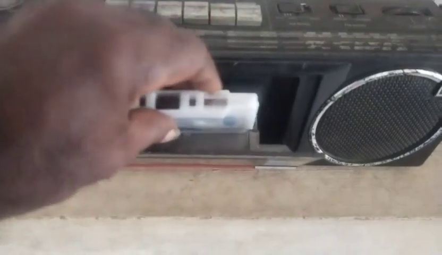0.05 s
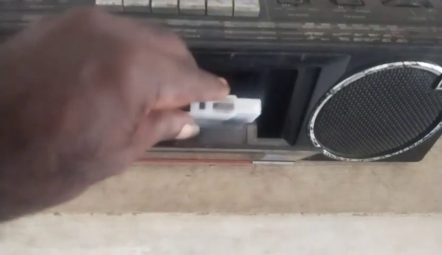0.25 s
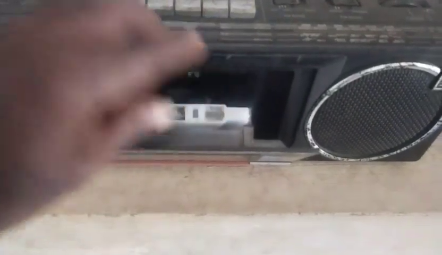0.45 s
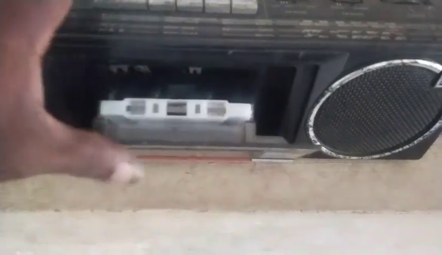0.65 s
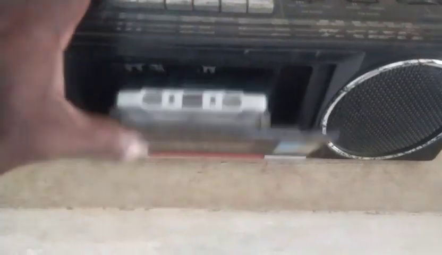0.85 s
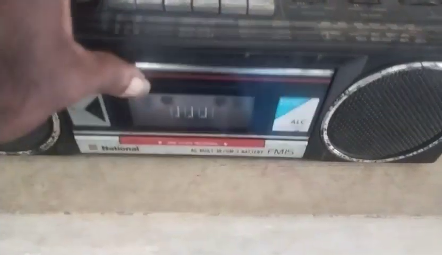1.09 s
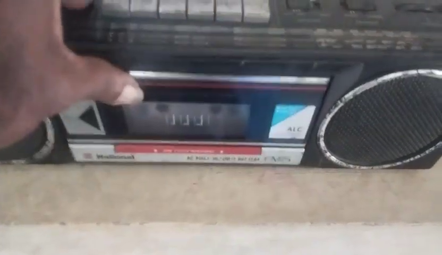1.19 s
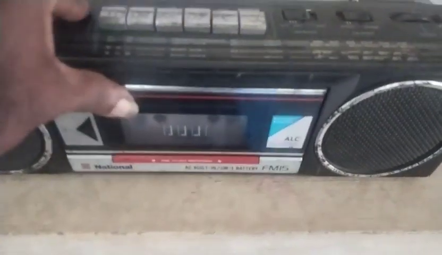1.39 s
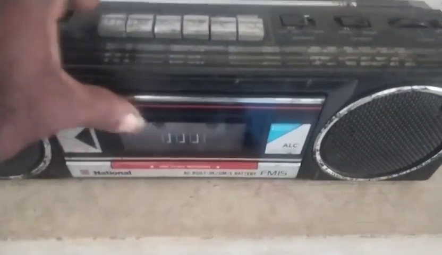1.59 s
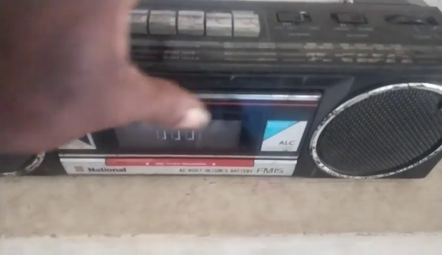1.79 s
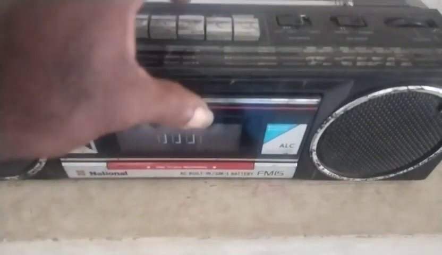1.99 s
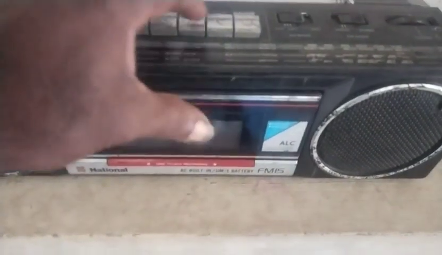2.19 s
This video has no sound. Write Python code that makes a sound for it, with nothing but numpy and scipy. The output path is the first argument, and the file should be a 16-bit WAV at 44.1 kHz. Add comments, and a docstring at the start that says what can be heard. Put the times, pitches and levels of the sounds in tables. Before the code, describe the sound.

Plastic clacks as a cassette slides into a player and its door snaps shut.

```python
"""A cassette slides into the open door of a portable player and clacks onto its seat; the door is pushed
shut and latches. The shell rubs and squeaks, each contact rattles the plastic, weighty blows ring the
hollow case, and the metal tape mechanism rings on after the cassette's knocks. The player sits to the
left in a bare, echoing room. Birds call faintly from outside over a low rumble."""
import sys
import numpy as np
from scipy import signal
from scipy.fft import rfft, irfft
from scipy.io import wavfile
from scipy.ndimage import uniform_filter1d

SR = 44100
rng = np.random.default_rng(int(sys.argv[2]) if len(sys.argv) > 2 else 0)


def generate_wav(sig):
    """Save sig (samples, or channels by samples) to the path in sys.argv[1] as 16-bit PCM at SR."""
    pcm = np.round(np.clip(np.atleast_2d(sig).T, -1, 1) * 32767).astype(np.int16)
    wavfile.write(sys.argv[1], SR, pcm)


N = 99225
T = np.arange(N) / SR
FFT_SIZE = 2 ** 17
HZ = np.maximum(np.arange(FFT_SIZE // 2 + 1) * SR / FFT_SIZE, 1)


def from_db(db):
    """Decibels to gain."""
    return 10 ** (np.asarray(db) / 20)


def unit_rms(x):
    """Scale to unit power."""
    return x / np.sqrt(np.mean(np.abs(x) ** 2) + 1e-20)


def at_hz(points, hz=HZ):
    """Read a table on a log-frequency axis."""
    freqs, values = np.transpose(points)
    return np.interp(np.log(hz), np.log(freqs), values)


def boosts(modes):
    """Gain curve of a set of resonances."""
    return 1 + sum((from_db(db) - 1) / (1 + (2 * (HZ - hz) / width) ** 2) for hz, width, db in modes)


def panned(points):
    """Left and right gain curves."""
    return from_db(at_hz(points) * np.array([[.5], [-.5]]))


def eq(x, gain):
    """Minimum-phase EQ with the given gain curve: no pre-ringing."""
    cepstrum = irfft(np.log(gain + 1e-9))
    size = cepstrum.shape[-1]
    cepstrum[..., 1:size // 2] *= 2
    cepstrum[..., size // 2 + 1:] = 0
    return irfft(rfft(x, size) * np.exp(rfft(cepstrum)), size)[..., :N]


def whiten(burst):
    """Flatten a burst's spectrum, so that only the plastic colours it."""
    power = uniform_filter1d(np.abs(rfft(burst)) ** 2, size=7)
    return eq(burst, np.sqrt(power.mean() / power))


def add(out, s, sound):
    """Mix a sound in at s seconds."""
    start = int(s * SR)
    part = sound[..., :max(N - start, 0)]
    out[..., start:start + part.shape[-1]] += part


def note(length, start_hz, end_hz, db, rough):
    """A gliding tone that swells and fades; rough is its jitter as a share of the pitch."""
    progress = np.linspace(0, 1, int(length * SR))
    jitter = unit_rms(uniform_filter1d(rng.standard_normal(N), size=60))[:len(progress)]
    hz = (start_hz + (end_hz - start_hz) * progress) * (1 + rough * jitter)
    return from_db(db) * np.sin(np.pi * progress) * np.sin(2 * np.pi * np.cumsum(hz) / SR)


# stereo image of the room: f/Hz, left-right correlation
ROOM_CORRELATION = [(300, 0.83), (600, 0.68), (1200, 0), (12000, 0.077)]


def diffuse_noise():
    """White stereo noise, narrow in the bass and wide in the treble."""
    mid, side = rfft(rng.standard_normal((2, FFT_SIZE)))
    alike = at_hz(ROOM_CORRELATION)
    return irfft(np.sqrt((1 + alike) / 2) * mid + np.sqrt((1 - alike) / 2) * side * [[1], [-1]])[:, :N]


# tone of the air and of the rumble: f/Hz, gain/dB
AIR_EQ = [(25, -27), (97, -6), (200, -20.5), (420, -15.5), (520, -7.5), (680, -19.5), (1400, -15.5),
          (3000, -21), (5500, -31), (10000, -31), (15000, -40)]
RUMBLE_EQ = [(30, -41.5), (70, -22.5), (97, 2.5), (125, -6), (152, -2.5), (230, -17), (3000, -91.5)]
# fader ride on the rumble: t/s, level/dB
RUMBLE_RIDE = [(0, -56.5), (.8, -68.5), (1.05, -52), (1.3, -51.5), (1.55, -56), (1.8, -70.5), (2.0, -67.5),
               (2.13, -63), (2.25, -78.5)]


def background(air_db=-61):
    """A bed of faint steady air and a low rumble that swells and sinks."""
    air = unit_rms(eq(diffuse_noise(), from_db(at_hz(AIR_EQ))))
    rumble = unit_rms(eq(diffuse_noise(), from_db(at_hz(RUMBLE_EQ))))
    return from_db(air_db) * air + rumble * from_db(np.interp(T, *np.transpose(RUMBLE_RIDE)))


# falling bird whistles: t/s, length/s, start f/Hz, end f/Hz, level/dB
BIRD_WHISTLES = [(1.40, .27, 4280, 3750, -52), (1.53, .19, 3200, 3000, -56), (1.57, .18, 3700, 3300, -59),
                 (1.70, .12, 2750, 2420, -62), (1.45, .22, 5600, 5000, -67), (2.19, .12, 5000, 4100, -65)]
# soft piping of a farther bird: t/s, length/s, f/Hz, level/dB
BIRD_PIPES = [(1.474, .08, 1515, -55), (1.592, 0.068, 1211, -51.5), (1.78, 0.049, 1162, -54),
              (1.905, 0.095, 1224, -53.5), (2.065, 0.028, 1274, -52.5), (2.092, 0.13, 1230, -55)]


def birds():
    """Raspy whistles and a row of piping notes, scattered differently on the way to each side."""
    out = np.zeros((2, N))
    for side in out:
        for s, length, start_hz, end_hz, db in BIRD_WHISTLES:
            add(side, s, note(length, start_hz, end_hz, db, rough=.045))
        for s, length, hz, db in BIRD_PIPES:
            add(side, s, note(length, hz, hz, db, rough=.02))
    return out


# reverb decay: f/Hz, T60/s
ROOM_DECAY = [(100, 3.9), (260, 1.06), (700, 1.29), (1900, 0.99), (4800, 1.31), (8000, 0.89), (13000, 0.8)]
# tone of the reverb return: f/Hz, gain/dB
ROOM_EQ = [(110, -6), (250, -1.5), (550, -2.5), (1100, -0.5), (2200, -4), (4200, -9.5), (8000, -2.5),
           (14000, -9)]
# room resonances: f/Hz, width/Hz, boost/dB
ROOM_RESONANCES = [(200, 27, 10.5), (531, 14, 4), (696, 20, 4.5)]
# balance of the reverb: f/Hz, left over right/dB
ROOM_BALANCE = [(250, -0.5), (1100, 1.5), (2200, 7), (4500, 4), (8500, -4.5), (13000, -1)]


def room(x, build_s=0.013):
    """Bare walls return a diffuse tail that builds quickly and hangs longest in the bass."""
    noise, tail = rfft(diffuse_noise(), FFT_SIZE), 0
    centres = np.geomspace(60, 15000, num=14)
    for hz, pick in zip(centres, np.eye(len(centres))):
        band = irfft(noise * np.interp(np.log(HZ), np.log(centres), pick))[:, :N]
        tail = tail + band * from_db(-60 * T / at_hz(ROOM_DECAY, hz))
    tail = tail * (1 - np.exp(-T / build_s))
    wet = signal.fftconvolve(x[None], unit_rms(tail) / np.sqrt(N), axes=1)[:, :N]
    return eq(wet, from_db(at_hz(ROOM_EQ)) * boosts(ROOM_RESONANCES) * panned(ROOM_BALANCE))


# ring of the metal tape mechanism: f/Hz, gain/dB
METAL_MODES = [(1625, -23), (2000, -21.5), (2630, -21), (3950, -30)]


def mechanism(knocks, t60_s=1.25, detune=.009, partials=4):
    """With the door open, each knock leaves the metal ringing in clusters of close, beating partials."""
    ring = 0
    for hz, db in METAL_MODES:
        pitches = hz * (1 + detune * rng.standard_normal(partials))
        cluster = np.sin(2 * np.pi * np.outer(pitches, T)).sum(axis=0)
        ring = ring + from_db(db) * unit_rms(cluster * from_db(-60 * T / t60_s)) / np.sqrt(N)
    return signal.fftconvolve(knocks, ring)[:N]


# weighty blows on the case: t/s, level/dB
CASE_BLOWS = [(.083, -27.5), (0.168, -32), (.2660, -11.5), (.3160, -23), (.9255, -30), (1.407, -40.5)]
# body of the case: f/Hz, gain/dB, T60/s
CASE_RING = [(379, -18.5, 0.062), (507, -4, 0.07), (550.6, -13.5, 0.15), (645, -9, 0.058), (738, -9, 0.08),
             (1009, -12.5, 0.07), (1142, -16.5, 0.021)]


def case(band_hz=(270, 1445)):
    """The hollow case rings after each blow: too small for deep bass, struck too softly for treble."""
    out, t = np.zeros(N), T[:SR // 2]
    ring = sum(from_db(db - 60 * t / t60) * np.cos(2 * np.pi * hz * t) for hz, db, t60 in CASE_RING)
    for s, db in CASE_BLOWS:
        add(out, s, from_db(db) * ring)
    return signal.sosfilt(signal.butter(2, band_hz, "band", fs=SR, output="sos"), out)


# the shell rubs along the holder: t/s, level/dB
SLIDE_RIDE = [(0, -41.5), (.048, -37.5), (.085, -36.5), (.095, -54), (.145, -49.5), (.158, -36.5),
              (.18, -36), (.2, -51.5), (.23, -43.5), (.26, -60.5)]
# tone of the rubbing: f/Hz, gain/dB
SLIDE_EQ = [(60, -37), (250, -9.5), (400, -6.5), (620, 4.5), (900, -5.5), (1250, 3.5), (1570, -18),
            (1850, 5.5), (2300, 0), (4000, 0.5), (5500, -9.5), (14000, -34)]
# the shell sticks and squeaks: t/s, length/s, f/Hz, level/dB
SHELL_SQUEAKS = [(.036, .028, 1850, -32), (.062, 0.028, 1840, -33), (0.105, 0.022, 1900, -44),
                 (.148, .03, 1950, -44.5)]


def slide(slips_per_s=2500, spread_db=1):
    """Tiny uneven slips of the shell excite the holder and now and then lock into a short squeak."""
    slipping = rng.random(N) < slips_per_s / SR
    strength = from_db(spread_db * np.minimum(rng.exponential(1, N), 4))
    slips = slipping * strength * rng.choice([-1, 1], N)
    pressure = from_db(np.interp(T, *np.transpose(SLIDE_RIDE), right=-np.inf))
    out = eq(unit_rms(slips) * pressure, unit_rms(from_db(at_hz(SLIDE_EQ))))
    for s, length, hz, db in SHELL_SQUEAKS:
        add(out, s, note(length, hz, hz, db, rough=.035))
    return out


RATTLE_T60_S = 0.036
# small parts of the holder and door snap or knock: t/s, f/Hz, width/Hz, peak level/dB
PART_SNAPS = [(.158, 573, 246, -28), (0.2343, 3200, 1510, -15.5), (.8872, 4900, 2870, -16.5),
              (.9265, 2005, 1000, -11.5), (0.9306, 3440, 1500, -16), (1.411, 2730, 700, -40),
              (1.469, 2250, 340, -62), (1.471, 384, 143, -43.5), (1.483, 2300, 303, -47),
              (1.488, 517, 157, -39.5)]


def small_parts(size=2048):
    """Small stiff parts snap, each with a short rattle around its own pitch."""
    out = np.zeros(N)
    for s, hz, width, db in PART_SNAPS:
        resonance = signal.iirpeak(hz, hz / width, fs=SR)
        burst = whiten(rng.standard_normal(size) * from_db(-60 * T[:size] / RATTLE_T60_S))
        click = signal.lfilter(*resonance, signal.lfilter(*resonance, burst))
        add(out, s, from_db(db) * click / np.abs(click).max())
    return out


def contacts(hits, colour, modes, attack=1.3, correlation=0.73, bass_hz=1000, treble_hz=5500, size=4096):
    """Each contact is a sharp transient and a brief dense rattle that sets the plastic part ringing."""
    out = np.zeros((2, N))
    lowpass = signal.butter(2, bass_hz, fs=SR)
    bandpass = signal.butter(2, [bass_hz, treble_hz], "band", fs=SR)
    highpass = signal.butter(2, treble_hz, "high", fs=SR)
    for s, db, bass_db, treble_db in hits:
        noise = rng.standard_normal((3, size))
        rattle = np.sqrt(correlation) * noise[0] + np.sqrt(1 - correlation) * noise[1:]
        burst = rattle * from_db(-60 * T[:size] / RATTLE_T60_S)
        burst[:, 0] = attack
        burst = whiten(burst)
        bass = from_db(bass_db) * signal.lfilter(*lowpass, burst.mean(axis=0))
        mids = signal.lfilter(*bandpass, burst)
        treble = from_db(treble_db) * signal.lfilter(*highpass, burst)
        add(out, s, from_db(db) * (bass - mids + treble))   # mids flipped to avoid crossover notches
    return eq(out, unit_rms(from_db(at_hz(colour)) * boosts(modes)))


# clicks of the door: t/s, level/dB, bass/dB, treble/dB
DOOR_HITS = [(.8675, -43, 4, 10), (.8872, -27, -10, -1), (.897, -21.5, -3, 1), (.9025, -21.5, 4.5, -1),
             (.912, -23.5, 5, -11), (.9185, -24, 8, -4), (.9250, -21, 2.5, -6), (.9268, -13, -5, -4),
             (.9325, -23, 3, -4.5), (.9355, -25, 13, -5), (1.411, -59, 6, 21.5), (1.485, -51.5, 6, 12)]
# tone of the door: f/Hz, gain/dB
DOOR_EQ = [(50, -33.5), (260, -9), (400, -3), (560, 0), (780, -2.5), (1200, -7), (1900, -3.5), (2700, -1),
           (3900, -3), (7000, -13), (9000, -20), (14500, -25)]
# door resonances: f/Hz, width/Hz, boost/dB
DOOR_RESONANCES = [(1888, 148, 3), (2560, 142, 7.4), (3795, 120, 2.5)]


def door():
    """The door rides over its catch, latches, then creaks under the thumb."""
    return contacts(DOOR_HITS, DOOR_EQ, DOOR_RESONANCES)


# knocks of the cassette: t/s, level/dB, bass/dB, treble/dB
CASSETTE_HITS = [(.083, -38.5, -7, -12.5), (.2335, -23.5, -16.5, 4.5), (.2367, -23, -9.5, -0.5),
                 (.2525, -28.5, 2.5, -6.5), (.2598, -32.5, -0.5, 1.5), (.2658, -23, 10, 2),
                 (.2703, -12.5, 5.5, 2.5), (.2745, -19, -1, 3), (.2778, -19.5, 5, -5.5),
                 (.3116, -21, 6, -10), (.3168, -25, 4, -15.5), (.707, -37, 0.5, -19.5)]
# tone of the cassette: f/Hz, gain/dB
CASSETTE_EQ = [(50, -45), (130, -23), (270, -18.5), (470, -3.5), (800, -1.5), (2000, 5.5), (4100, 1),
               (6000, -8), (14500, -24)]
# cassette resonances: f/Hz, width/Hz, boost/dB
CASSETTE_RESONANCES = [(506, 40, 4.5), (745, 35, 7.5), (915, 70, 3), (1836, 90, 1.5), (3915, 150, 4.5)]


def cassette():
    """The plastic shell knocks in its holder and drops onto its seat."""
    return contacts(CASSETTE_HITS, CASSETTE_EQ, CASSETTE_RESONANCES)


def player():
    """All the plastic sounds as they leave the player in one direction, and the cassette's knocks alone."""
    knocks = cassette()
    return knocks + door() + small_parts() + slide() + case(), knocks


# balance of the player's direct sound: f/Hz, left over right/dB
PLAYER_BALANCE = [(550, 0), (1100, 4.5), (2200, 8), (4500, 10), (8500, 0), (13000, 1)]


def scene(right_lag_s=0.00012, bird_send_db=-4):
    """The player close by on the left, the birds outside; its front, its back and they feed the room."""
    front, knocks = player()
    back, _ = player()
    outside = birds()
    metal = [mechanism(side) for side in knocks]
    left, right = eq(front + metal, panned(PLAYER_BALANCE))
    right = irfft(rfft(right, FFT_SIZE) * np.exp(-2j * np.pi * HZ * right_lag_s))[:N]
    sends = [(face + from_db(bird_send_db) * outside).mean(axis=0) for face in (front, back)]
    reverb = sum(room(send) for send in sends) / np.sqrt(2)
    return np.array([left, right]) + outside + reverb + background()


# noise suppressor threshold: f/Hz, level/dB in a 1 Hz band
SUPPRESSOR_THRESHOLD = [(300, -102), (750, -89), (1400, -76), (3000, -90.5), (7000, -100), (14000, -114)]


def suppress(x, depth_db=-9, size=1024):
    """A soft multiband gate turns down each band as it sinks towards the noise."""
    hz, _, frames = signal.stft(x, SR, nperseg=size, scaling="psd")
    power = 2 * np.mean(np.abs(frames) ** 2, axis=0)
    power = uniform_filter1d(power, size=7, axis=0)   # smooth over frequency
    power = uniform_filter1d(power, size=3, axis=1)   # and over time
    threshold = from_db(at_hz(SUPPRESSOR_THRESHOLD, hz + 1))[:, None] ** 2
    openness = power / (power + threshold)
    gated = frames * from_db(depth_db * (1 - openness))
    return signal.istft(gated, SR, nperseg=size, scaling="psd")[1][:, :N]


def record(dry):
    """Master chain: noise suppressor, soft clip and a steep high cut."""
    high_cut = signal.cheby2(14, 70, 16200, fs=SR, output="sos")   # 70 dB down from 16.2 kHz
    return signal.sosfilt(high_cut, np.tanh(suppress(dry)))


dry = scene()
out = record(dry)
generate_wav(out)
```